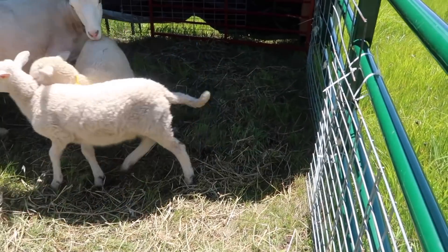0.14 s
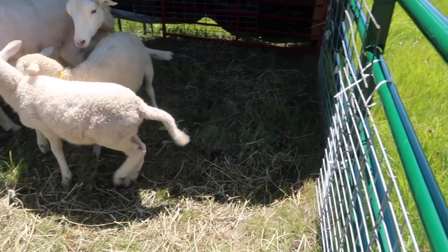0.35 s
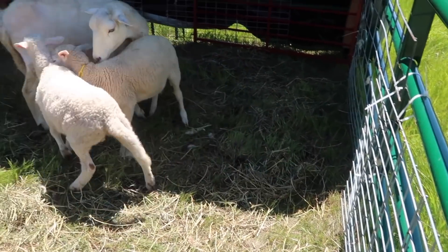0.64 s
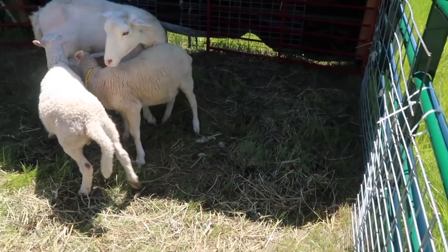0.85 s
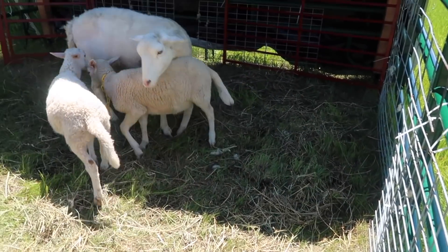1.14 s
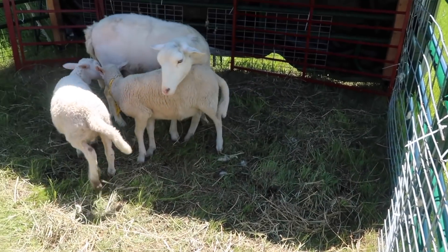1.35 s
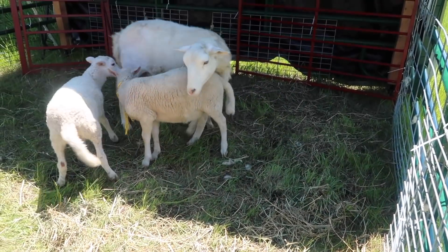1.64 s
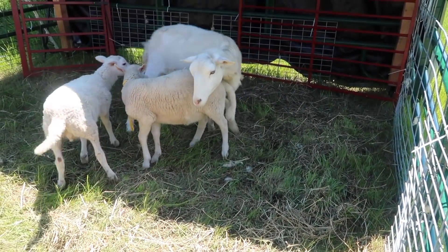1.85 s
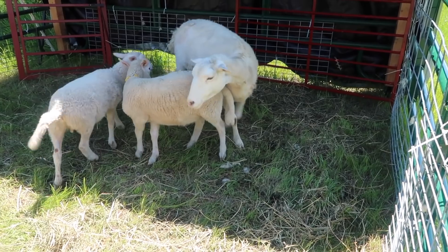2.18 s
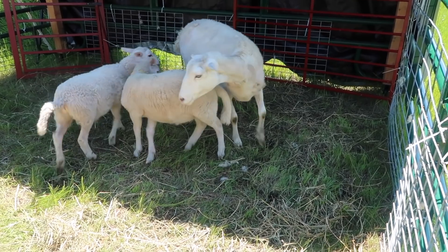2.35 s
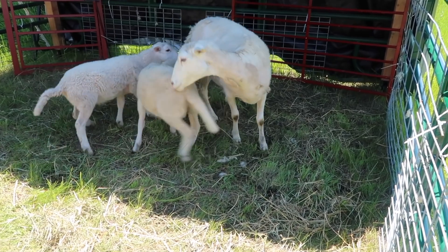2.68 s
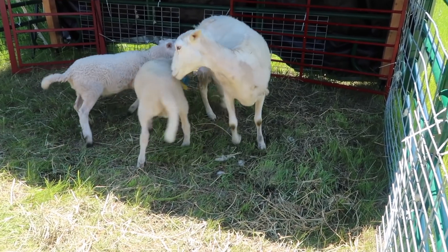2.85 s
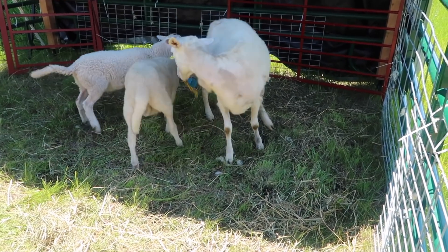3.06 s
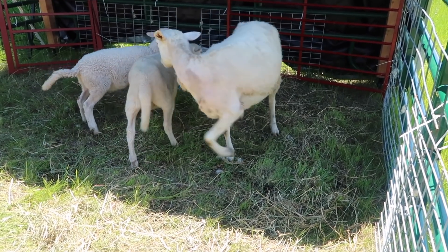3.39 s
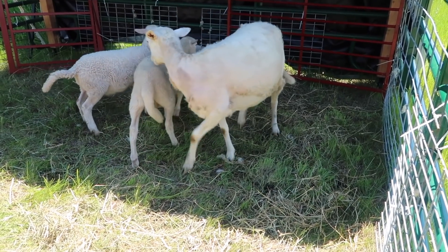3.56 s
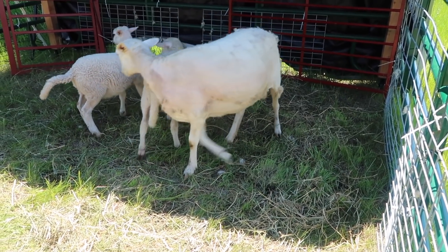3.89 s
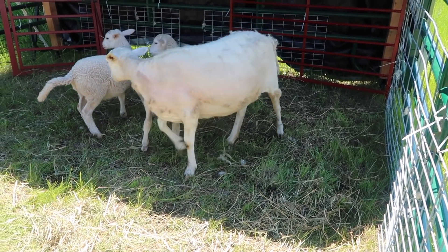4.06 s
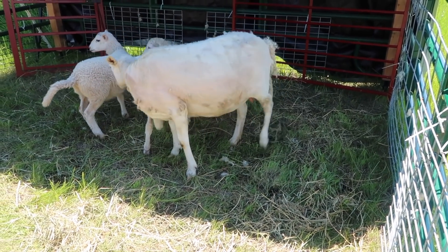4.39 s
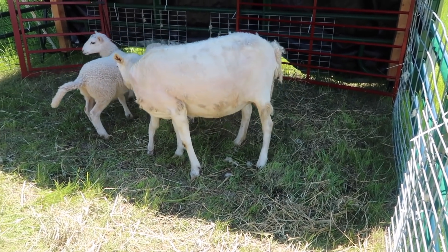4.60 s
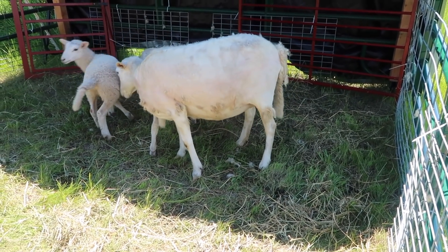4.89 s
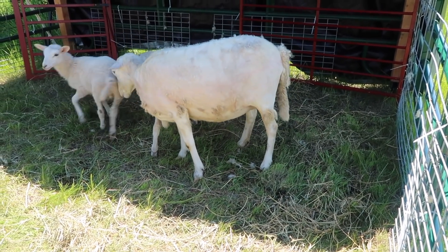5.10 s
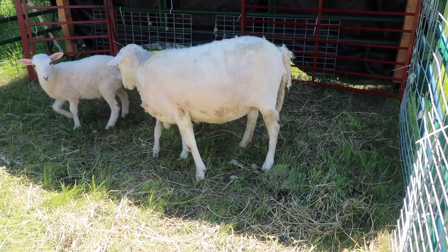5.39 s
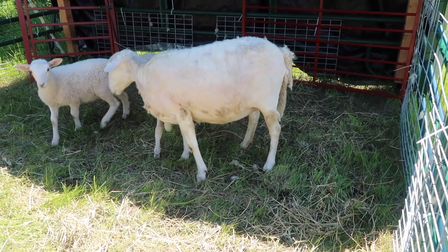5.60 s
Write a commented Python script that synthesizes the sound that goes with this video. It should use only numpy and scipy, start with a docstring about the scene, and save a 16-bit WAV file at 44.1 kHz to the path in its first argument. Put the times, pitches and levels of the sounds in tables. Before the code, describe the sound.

The sound opens outdoors on the fading ring of a bumped steel fence panel, followed by another light, rattling clang at about 0.4 seconds. Sheep shuffle softly through dry straw, with a stem snapping near 1.8 seconds. From about 2.5 to 3.2 seconds a lamb bleats once, close to the microphone and clearly the loudest sound; the call is slightly rough, steps up in pitch and wavers with small breaks. Around 4 seconds a ewe gives three quiet, low, very short grunts, followed at once by a dull hoof thud and a crack of straw. Scattered small snaps and rustles continue until the end, near 5.7 seconds. Behind everything lie a soft hush of open air, barely audible crickets and a distant idling engine, its low hum growing from about 2 seconds. Faint, far birds chirp now and then, more often in the second half.

```python
"""A lamb in a straw pen

A lamb bleats once nearby: its vocal folds drive the resonances of mouth and throat. The flock bumps
a steel tube panel, which rings in its normal modes; a ewe grunts low, and hooves thud and crack the
straw. Far birds whistle, crickets tick and an engine idles across the field, under the hush of open air."""
import sys
import numpy as np
from scipy import signal
from scipy.fft import rfft, irfft
from scipy.io import wavfile
from scipy.ndimage import uniform_filter1d

SR = 44100
rng = np.random.default_rng(int(sys.argv[2]) if len(sys.argv) > 2 else 0)


def master_out(mix):
    """Clip the mix to full scale and print it as 16-bit PCM to the path in sys.argv[1]."""
    frames = np.transpose(np.atleast_2d(mix))
    ceiling = np.clip(frames, -1, 1)
    pcm = np.round(ceiling * 32767).astype(np.int16)
    wavfile.write(sys.argv[1], SR, pcm)


N = 253134

# Pitch the lamb aims for (time [s], frequency [Hz])
LAMB_PITCH = [(2.505, 266), (2.527, 257), (2.562, 255), (2.609, 246), (2.693, 283), (2.735, 279),
              (2.752, 361), (3.0, 357), (3.066, 365), (3.086, 335), (3.165, 332)]
# Vocal effort (time [s], level [dB], roughness [0-1])
LAMB_EFFORT = [(2.505, -75, 0), (2.527, -43, 0), (2.578, -34, .2), (2.61, -16.5, .32), (2.69, -15.5, .3),
               (2.75, -20, .22), (2.86, -21, .18), (2.94, -21, .12), (3.062, -21.5, .15),
               (3.082, -19.5, .3), (3.13, -20, .28), (3.165, -52, .7)]
# Brief slackenings of the folds (time [s], pitch drop [Hz], fall [s], recovery [s])
VOICE_BREAKS = [(2.578, 26, .022, .03), (2.785, 80, .026, .085), (2.899, 66, .045, .055),
                (3.088, 30, .028, .055)]
# Unmoving cavities of the voice (frequency [Hz], width [Hz], gain [dB])
UPPER_CAVITIES = [(3060, 340, -3), (3310, 340, -2), (3720, 340, -13)]
# Air over the teeth (frequency [Hz], gain [dB])
BREATH_SPECTRUM = [(4250, -45), (4900, -1), (5500, -5), (6300, -2), (7900, -4), (8800, -17), (13000, -19),
                   (15000, -28), (15700, -40)]
# Normal modes of the steel tubes (frequency [Hz], relative level [dB], T60 [s])
TUBE_MODES = [(612, -9.5, 0.23), (1035, -4, 0.2), (1120, -5.5, 0.18), (1266, -16, 0.41),
              (1404, -10.5, 0.38), (1556, -28, 2.8), (1601, 3, 0.13), (1830, -2, 0.033), (1840, -23, 0.24),
              (1960, -25, 0.16), (2000, -18, 0.23), (2089, -4, 0.12), (2460, -14, 0.12), (2776, -20, 0.08),
              (2870, -36, 0.47), (3430, -38, 0.58), (340.5, -26.5, 1.73), (565, -24.5, 0.86),
              (3050, -38, 1.3), (1545, -24, 1.62), (1575, -23.5, 1.3), (4075, -20.5, 0.46),
              (4800, -27, 0.41)]
# Blows on the panel; one at negative time is already ringing out (time [s], gain [dB], bass gain [dB])
PANEL_BLOWS = [(-.14, -14.5, -4), (0.3801, -21.5, -11), (0.388, -23.5, -15), (.412, -28.5, -12.5),
               (0.42, -36.5, -12), (0.446, -53, -4)]
# Shiver of the wire mesh (frequency [Hz], gain [dB])
MESH_SPECTRUM = [(120, -55), (250, -17), (600, -13.5), (800, -24), (1060, -8.5), (1250, -17.5),
                 (1580, -5.5), (2100, -19.5), (2900, -21), (3600, -18.5), (4050, -11), (4400, -15),
                 (4950, -9), (5700, -21), (7700, -22.5), (9000, -37), (14000, -59)]
# Damping of the mesh (frequency [Hz], T60 [s])
MESH_DECAY = [(300, 0.77), (1000, 1), (1800, 0.69), (3000, 0.5), (5000, 0.16), (9000, 0.18)]
# Pulse trains of the ewe (time [s], duration [s], relative level [dB], pulse rate [Hz])
EWE_GRUNTS = [(3.9, 0.038, -44, 150), (3.978, 0.03, -39, 150), (4.053, 0.04, -40.5, 150)]
# Resonances of her closed mouth (frequency [Hz], width [Hz], gain [dB])
EWE_FORMANTS = [(157, 140, -2), (780, 280, 0), (1550, 270, -7)]
# A hoof set down hard (time [s], level [dB], frequency [Hz], T60 [s])
HOOF_THUDS = [(4.152, -22.5, 145, 0.089)]
# Stems breaking (time [s], relative level [dB], centre [Hz], spread [octaves])
STRAW_SNAPS = [(.782, -53, 4970, 1.8), (1.806, -36.5, 2050, 1), (2.3, -52, 2500, .8),
               (4.145, -42, 1860, 0.52), (4.146, -37, 670, 0.54), (4.465, -48, 3220, .5),
               (4.577, -45, 7650, 0.48), (5.15, -44.5, 1990, .6), (5.366, -43, 4860, 0.52),
               (5.37, -37, 600, 0.52), (5.409, -48, 520, 0.51), (5.515, -45.5, 6900, 1.1),
               (5.549, -48, 2200, .5)]
# Brief swells of high crackling rustle (time [s], peak level [dB], time to fade 10 dB [s])
RUSTLE_SWELLS = [(0.0, -48, .07), (.19, -50, .07), (.324, -48, .08), (.57, -46.5, .05), (.92, -50, .05),
                 (1.33, -52, .06), (2.05, -58, .08), (2.27, -58, .1), (3.44, -53.5, .02), (3.71, -62, .1),
                 (4.1, -53, .13), (4.47, -53, .08), (4.585, -51, .035), (5.29, -59, .15), (5.52, -57, .03)]
# Continuous shuffling in the straw (time [s], level [dB])
SHUFFLE_LEVEL = [(0, -62), (.7, -60), (.84, -70), (1.0, -58), (1.3, -58), (1.42, -63), (1.95, -62),
                 (2.5, -57), (3.2, -60), (3.5, -75), (4.7, -88), (5.05, -80), (5.74, -65)]
# Colour of the crackle (frequency [Hz], gain [dB])
STRAW_SPECTRUM = [(1500, 10), (3500, 1), (6000, 2.5), (10000, -0.5), (13000, 1.5), (15500, -25)]
# Bird notes (time [s], duration [s], start [Hz], middle [Hz], end [Hz], relative level [dB])
BIRD_WHISTLES = [(.87, .2, 2420, 2463, 2590, -53.5), (1.018, 0.064, 3590, 3350, 3270, -56),
                 (1.755, 0.045, 3400, 2800, 2500, -54), (1.866, 0.052, 2470, 2810, 3470, -55),
                 (1.933, 0.033, 2700, 2550, 2460, -56), (3.603, 0.035, 5750, 5540, 5570, -58.5),
                 (3.965, 0.1, 4940, 4600, 4340, -55), (4.042, 0.07, 4000, 3260, 2950, -50.5),
                 (4.172, 0.085, 2300, 3050, 3800, -54), (4.265, 0.065, 3050, 2860, 2890, -58),
                 (5.22, 0.039, 2630, 3240, 4050, -54), (5.258, .03, 4040, 4010, 4000, -58),
                 (5.264, 0.0091, 3560, 3450, 3300, -47), (5.305, 0.059, 2450, 2750, 2620, -51),
                 (5.446, 0.062, 3430, 3010, 2170, -51), (5.608, 0.043, 3000, 2950, 2800, -60.5)]
# Runs of chips (time [s], relative level [dB], period [s], first [Hz], last [Hz], fall per chip [Hz])
BIRD_TRILLS = [(4.297, -51, .0187, 4530, 4410, 300)]
# Crickets far in the grass (time [s], duration [s], pitch [Hz], tick rate [Hz], relative level [dB])
CRICKET_CALLS = [(.5, 1.5, 4000, 32, -67), (3.2, 2.5, 5700, 34, -68)]
# Engine harmonics (order [multiple of the cycle rate], level [dB], share of the bass swell [0-1])
ENGINE_ORDERS = [(3, -53.5, 0.8), (4, -53.5, 0.93), (5, -60, 0.88), (6, -68.5, .6), (7, -66, 0.9),
                 (8, -59.5, 0.34), (10, -68, 0), (12, -64, 0.42), (13, -65.5, 0.42), (18, -72, 0.2)]
# Two-step rise in the bass of the hum and the air (time [s], gain [dB])
BASS_SWELL = [(0, -4.6), (2.15, -2.8), (2.3, 3), (2.65, 1.5), (2.8, 6), (4, 8.5), (5.74, 9.5)]
# Soft far swells of noise (time [s], duration [s], centre [Hz], width [Hz], level [dB])
FAR_SWELLS = [(1.35, .45, 1200, 1100, -56), (4.53, .4, 1480, 160, -60)]
# Noise of the open air (frequency [Hz], relative spectral density [dB])
AIR_SPECTRUM = [(25, -24), (45, -27), (62, -25), (110, 2), (170, -3.1), (300, -2), (500, -4), (1000, -6),
                (2000, -11.5), (4000, -16.5), (8000, -25), (10500, -27.5), (13000, -40), (15500, -64)]
# Slow drift of that noise (time [s], gain [dB])
AIR_DRIFT = [(0, 2), (1.5, 1), (2.3, -0.1), (3.5, 0), (4.7, -0.3), (5.74, -0.2)]
# Stereo width of near sound (frequency [Hz], side gain [dB])
NEAR_WIDTH = [(60, -49), (150, -58), (380, -53), (950, -32), (2380, -22), (5980, -8.5), (15000, 5)]
# Stereo width of diffuse sound (frequency [Hz], side gain [dB])
DIFFUSE_WIDTH = [(60, -64), (150, -35), (380, -14), (950, -9.5), (2400, -3), (6000, 1.5), (11000, 4),
                 (13000, 10), (15000, 17)]

OPENS_AT_S, OPENING_S = 2.562, .022
MOUTH_SHUT_HZ, MOUTH_OPEN_HZ, MOUTH_SAG_HZ_PER_S, MOUTH_THIN_HZ = 260, 850, 100, 80
THROAT_SHUT_HZ, THROAT_OPEN_HZ, THROAT_SAG_HZ_PER_S = 2380, 2180, 110
THIN_FROM_HZ, THIN_TO_HZ = 325, 360  # over this range the tongue hollows and the low voice weakens
LOW_SHUT_DB, LOW_OPEN_DB, LOW_THIN_DB = 2, -5.5, -3.5
LOW_FLANK_DB, LOW_BOTTOM_DB = 6, -5  # the low voice swells on a break's flanks and chokes at its bottom
CHEST_DB, CHEST_CEILING_DB = -13, -35.5  # fundamental: level relative to effort, and upper limit
ENGINE_CYCLE_HZ, AIR_DB, BAND_LIMIT_HZ = 24.19, -49, 15700


def lamb_bleat():
    """Source and filter: the folds excite formants that shift as the mouth opens and the voice thins."""
    times, *columns = np.transpose(LAMB_EFFORT)
    t = np.arange(times[0], times[-1], 1 / SR)
    effort_db, rough = (np.interp(t, times, c) for c in columns)
    slack, drop_hz = voice_breaks(t)
    hz = along(LAMB_PITCH, t) - drop_hz
    folds, puffs, cycles = vocal_folds(hz, rough=np.clip(rough + .33 * slack, 0, 1))

    thin = np.clip((hz - THIN_FROM_HZ) / (THIN_TO_HZ - THIN_FROM_HZ), 0, 1)
    open_s = t - OPENS_AT_S
    gape = np.clip(open_s / OPENING_S, 0, 1)
    open_mouth_hz = MOUTH_OPEN_HZ - MOUTH_SAG_HZ_PER_S * open_s - MOUTH_THIN_HZ * thin
    mouth_hz = blend(MOUTH_SHUT_HZ, open_mouth_hz, gape)
    throat_hz = blend(THROAT_SHUT_HZ, THROAT_OPEN_HZ - THROAT_SAG_HZ_PER_S * open_s, gape)

    low = resonate(formant(folds + .25 * puffs, mouth_hz, 430), mouth_hz, 430)
    low_db = blend(LOW_SHUT_DB, LOW_OPEN_DB, gape) + LOW_THIN_DB * thin
    low_db += LOW_FLANK_DB * gape * np.sin(np.pi * slack) + LOW_BOTTOM_DB * slack ** 2
    # nose and chest carry the fundamental
    chest = amp(np.minimum(CHEST_DB, CHEST_CEILING_DB - effort_db)) * np.cos(2 * np.pi * cycles)

    drive = folds + .8 * puffs
    tongue_hollow = blend(.12, .58, thin) * formant(drive, 1815, 710)
    throat = amp(-1) * (formant(drive, throat_hz, 270) + tongue_hollow)
    cavities = sum(amp(db) * formant(drive, centre, width) for centre, width, db in UPPER_CAVITIES)
    breath = shaped(.35 * folds + 2.3 * puffs + .35 * rng.standard_normal(len(t)), BREATH_SPECTRUM)
    high = unit(throat - cavities) + amp(-10.5) * breath

    voice = amp(low_db) * unit(low) + chest - high
    out = np.zeros(N)
    add(out, times[0], amp(effort_db) * voice * signal.windows.tukey(len(t), .03))
    return out + amp(-10) * echoes(out, t60=.04)  # ground and shelter wall close by


def vocal_folds(hz, rough):
    """Quasi-periodic oscillation: roughness adds jitter, shimmer and a puff of air in each cycle."""
    jitter, shimmer = smooth_noise((2, len(hz)), 150, passes=2)
    cycles = np.cumsum(hz * (1 + .07 * rough * jitter)) / SR
    # the folds never close twice alike: each harmonic wanders in level and phase, the high ones most
    k = np.arange(1, 24)[:, None]
    level_wander, phase_wander = smooth_noise((2, len(k), len(hz)), 700, passes=2)
    depth = np.sqrt(k / 8) * (.5 + 1.5 * rough)
    phase = k * cycles + .03 * k ** 2 + .08 * depth * phase_wander
    harmonics = amp(3.5 * depth * level_wander) * np.cos(2 * np.pi * phase)
    folds = unit(harmonics.sum(0)) * amp(3.5 * rough * shimmer)
    airflow = .4 + np.exp(-(cycles % 1) / .55)
    puffs = rough * unit(airflow * rng.standard_normal(len(hz)))
    return folds, puffs, cycles


def voice_breaks(t):
    """Lower tension lowers pitch: returns the slackness, in sharp cusps, and the pitch drop in Hz."""
    ramps = [np.interp(t, [s - fall, s, s + back], [0, 1, 0]) for s, _, fall, back in VOICE_BREAKS]
    cusps = np.array(ramps) ** 1.6
    return cusps.sum(0), np.array(VOICE_BREAKS)[:, 1] @ cusps


def panel_clang():
    """Modal ringing: each blow excites beating pairs of tube modes and a damped shiver of wire mesh."""
    out, t = np.zeros(N), np.arange(60000) / SR
    hz, db, t60 = np.transpose(TUBE_MODES)[:, :, None]
    bins, times, _ = signal.stft(t, SR, nperseg=256)
    bins = bins[:, None]
    mesh_fade = amp(on_log(MESH_SPECTRUM, bins) - 60 * times / on_log(MESH_DECAY, bins))
    for s, blow_db, bass_db in PANEL_BLOWS:
        phase, twin_phase, split = rng.random((len(TUBE_MODES), 3)).T[:, :, None]
        twin_hz = hz * (1.008 + .01028 * split)
        pairs = np.sin(2 * np.pi * (hz * t + phase))
        pairs += .58 * np.sin(2 * np.pi * (twin_hz * t + twin_phase))
        tubes = amp(db + bass_db / (1 + (hz / 750) ** 4) - 60 * t / t60) * pairs
        noise = signal.stft(rng.standard_normal(len(t)), nperseg=256)[2]
        mesh = noise * mesh_fade * amp(bass_db / (1 + (bins / 750) ** 4))
        shiver = signal.istft(mesh, nperseg=256)[1][:len(t)]
        add(out, s, amp(blow_db) * (amp(2) * tubes.sum(0) + amp(13.5) * shiver) * attack(t, .0002))
    return out


def ewe_grunts():
    """Impulse excitation: separate, uneven glottal pulses ring the resonances of a closed mouth."""
    source = np.zeros(N)
    for s, length, db, rate in EWE_GRUNTS:
        t = np.arange(0, length, 1 / SR)
        pulses = np.diff(np.floor(t * rate), prepend=-1) * amp(1.5 * rng.standard_normal(len(t)))
        add(source, s, amp(db) * (pulses + .035 * rng.standard_normal(len(t))))
    return sum(amp(db) * formant(source, hz, width) * SR / (2 * width) for hz, width, db in EWE_FORMANTS)


def hoof_thud():
    """Damped oscillation: the impact of a hoof gives one low, quickly decaying sinusoid."""
    out, t = np.zeros(N), np.arange(6000) / SR
    for s, db, hz, t60 in HOOF_THUDS:
        add(out, s, amp(db - 60 * t / t60) * np.sin(2 * np.pi * hz * t) * attack(t, .0034))
    return out


def straw(snap_db):
    """Brittle fracture: dry stems snap singly, over a high crackling rustle that swells briefly."""
    out, t = np.zeros(N), np.arange(600) / SR
    hz = np.fft.rfftfreq(len(t), 1 / SR) + 1
    for s, db, centre_hz, spread in STRAW_SNAPS:
        band = np.exp(-.5 * (np.log2(hz / centre_hz) / (.5 * spread)) ** 2)
        burst = unit(irfft(rfft(rng.standard_normal(len(t))) * band, len(t)))
        add(out, s, amp(db + snap_db - 60 * t / .028) * burst * attack(t, .00017))
    strengths = amp(1.1 * np.minimum(rng.exponential(1, N), 5))
    clicks = strengths * (rng.random(N) < 1500 / SR)  # about 1500 a second
    crackle = signal.oaconvolve(clicks, amp(-60 * t[:130] / .012))[:N] * rng.standard_normal(N)
    return out + rustle_level(np.arange(N) / SR) * unit(shaped(crackle, STRAW_SPECTRUM))


def rustle_level(t):
    """Incoherent sounds add in power: the joint amplitude of brief swells and continuous shuffling."""
    swell_power = sum(amp(db - 10 * abs(t - s) / fade) ** 2 for s, db, fade in RUSTLE_SWELLS)
    return np.sqrt(swell_power + amp(along(SHUFFLE_LEVEL, t)) ** 2)


def bird_calls(chips=18):
    """Nearly pure tones: single whistles, and a trill of short falling chips."""
    out = np.zeros(N)
    for s, *note in BIRD_WHISTLES:
        add(out, s, whistle(*note))
    for s, db, period, first_hz, last_hz, fall_hz in BIRD_TRILLS:
        for k, hz in enumerate(np.linspace(first_hz, last_hz, chips)):
            chip_db = db - 4 * abs(k / chips - .25)
            chip = whistle(.62 * period, hz + fall_hz / 2, hz, hz - fall_hz / 2, chip_db, warble=.002)
            add(out, s + k * period, chip)
    return out


def whistle(length, start_hz, mid_hz, end_hz, db, warble=.014):
    """Frequency modulation: a sine glides along a parabola through three pitches."""
    u = np.linspace(-.5, .5, round(length * SR))
    hz = mid_hz + (end_hz - start_hz) * u + 2 * (start_hz + end_hz - 2 * mid_hz) * u ** 2
    flutter = smooth_noise(len(u), 150)  # air on the way shakes the level
    hz *= 1 + warble * smooth_noise(len(u), 100)
    tone = np.sqrt(2) * np.sin(2 * np.pi * np.cumsum(hz) / SR)
    return amp(db + 4.5 * flutter) * tone * signal.windows.tukey(len(u), .5)


def crickets():
    """Stridulation: faint uneven ticks, each a few milliseconds of one pitch."""
    out, t = np.zeros(N), np.arange(300) / SR
    for s, length, hz, rate, db in CRICKET_CALLS:
        size = round(length * SR)
        pace = rate * (1 + .3 * smooth_noise(size, 2000))
        onsets = np.diff(np.floor(np.cumsum(pace) / SR), prepend=0)
        ticks = onsets * amp(db + 5.3 * rng.standard_normal(size))
        add(out, s, signal.oaconvolve(ticks, np.hanning(len(t)) * np.sin(2 * np.pi * hz * t)))
    return out


def engine_idle():
    """Harmonic series of the engine cycle, wavering slightly in level and speed."""
    out, t = np.zeros(N), np.arange(N) / SR
    swell_db = along(BASS_SWELL, t)
    wavers = smooth_noise((len(ENGINE_ORDERS) + 1, N // 441 + 2), 12)  # 100 values a second
    *level_wavers, speed_waver = [np.interp(t, np.arange(len(w)) / 100, w) for w in wavers]
    cycles = np.cumsum(ENGINE_CYCLE_HZ * (1 + .0013 * speed_waver)) / SR
    for (k, db, share), waver in zip(ENGINE_ORDERS, level_wavers):
        phase = k * cycles + .23 * k ** 2  # phase bends with order, smoothing the throb of the hum
        out += np.sqrt(2) * amp(db + share * swell_db + .98 * waver) * np.sin(2 * np.pi * phase)
    return out


def far_swells():
    """Amplitude modulation: soft bands of noise rise and fall."""
    out = np.zeros(N)
    for s, length, hz, width, db in FAR_SWELLS:
        band = unit(formant(rng.standard_normal(round(length * SR)), hz, width))
        add(out, s, amp(db) * band * signal.windows.tukey(len(band), .6))
    return out


def open_air():
    """Diffuse field: noise in drifting patches; its bass rises in two steps, along with the hum."""
    frames, hz = N // 256 + 5, np.fft.rfftfreq(1024, 1 / SR)[:, None]
    t = np.arange(frames) * 256 / SR
    mid_re, mid_im, side_re, side_im, patches = rng.standard_normal((frames, 513, 5)).T
    patches = unit(uniform_filter1d(uniform_filter1d(patches, size=14, axis=0), size=12, axis=1))
    bass_db = 1.67 * along(BASS_SWELL, t) / (1 + (hz / 170) ** 2)
    level = amp(on_log(AIR_SPECTRUM, hz) + 1.27 * patches + along(AIR_DRIFT, t) + bass_db)
    spectra = np.array([mid_re + 1j * mid_im, (side_re + 1j * side_im) * amp(on_log(DIFFUSE_WIDTH, hz))])
    mid, side = signal.istft(spectra * level, nperseg=1024, noverlap=768)[1][:, :N]
    return amp(AIR_DB) * stereo(mid, side) / np.std(mid)


def echoes(x, t60):
    """Reflection from shelter, ground and trees: sparse decaying taps of random sign and unit energy."""
    delays = np.arange(300, 26000, 22)
    taps = np.zeros(delays[-1] + 22)
    gains = rng.choice([-1., 1.], len(delays)) * amp(-60 * delays / SR / t60)
    taps[delays + rng.integers(0, 22, len(delays))] = gains
    return signal.fftconvolve(x, taps / np.linalg.norm(taps))[:N]


def resonate(x, hz, width):
    """Unit-gain resonance by heterodyning: shift hz down to zero, smooth, and shift back."""
    carrier = np.exp(2j * np.pi * np.cumsum(hz * np.ones(len(x))) / SR)
    pole = np.exp(-np.pi * width / SR)
    return 2 * (carrier * signal.lfilter([1 - pole], [1, -pole], x / carrier + 1e-18)).real


def formant(x, hz, width):
    """Two like resonances in cascade give a peak with steeper skirts."""
    return resonate(resonate(x, hz, width), hz, width)


def shaped(x, spectrum, phasor=1):
    """Linear filtering by a dB spectrum; a phasor of 1j shifts the phase a quarter cycle."""
    gain = amp(on_log(spectrum, np.fft.rfftfreq(len(x), 1 / SR)))
    return irfft(rfft(x) * phasor * gain, len(x))


def smooth_noise(shape, span, passes=1):
    """Moving averages over span samples turn white noise into a slow fluctuation of unit RMS."""
    noise = rng.standard_normal(shape)
    for _ in range(passes):
        noise = uniform_filter1d(noise, size=span)
    return unit(noise)


def amp(db):
    return 10 ** (np.asarray(db) / 20)


def unit(x):
    return x / np.sqrt(np.mean(abs(x) ** 2) + 1e-20)


def blend(start, end, share):
    return start + share * (end - start)


def attack(t, rise_s):
    return np.minimum(t / rise_s, 1)


def on_log(points, hz):
    frequencies, values = np.transpose(points)
    return np.interp(np.log(hz + 1), np.log(frequencies + 1), values)


def along(points, t):
    return np.interp(t, *np.transpose(points))


def add(mix, s, sound):
    start = round(s * SR)
    sound = sound[max(-start, 0):]
    part = mix[max(start, 0):][:len(sound)]
    part += sound[:len(part)]


def stereo(mid, side):
    return np.array([mid + side, mid - side])


def scene():
    """Superposition: direct sound and reflections sum into mid and side signals."""
    lamb, panel, birds = lamb_bleat(), panel_clang(), bird_calls()
    near = lamb + ewe_grunts() + hoof_thud()
    mid = near + engine_idle() + amp(-23.5) * echoes(lamb, t60=.6)
    mid += panel + amp(-7) * echoes(panel, t60=.14)
    mid += amp(-3.5) * birds + amp(-6) * echoes(birds, t60=.44)
    mid += straw(snap_db=-.1)
    diffuse = amp(-32) * echoes(lamb, t60=.45) + amp(-4.5) * echoes(panel, t60=.032)
    diffuse += amp(-1.5) * echoes(birds, t60=.019) + amp(-3.5) * straw(snap_db=-3)
    # near sound reaches left and right a moment apart, so its side signal is a quarter cycle off
    side = shaped(near, NEAR_WIDTH, phasor=1j) + shaped(diffuse, DIFFUSE_WIDTH)
    ticks = crickets()  # off to the side, so weak in the middle
    mid += far_swells() + amp(-6) * ticks
    side += amp(1.5) * shaped(ticks, DIFFUSE_WIDTH, phasor=1j)
    return stereo(mid, side) + open_air()


def record(dry):
    """Band limiting: a linear-phase low-pass filter removes the highest treble."""
    lowpass = signal.firwin(511, BAND_LIMIT_HZ, window=("kaiser", 9), fs=SR)
    return signal.oaconvolve(dry, lowpass[None], "same")


dry = scene()
out = record(dry)
master_out(out)
```